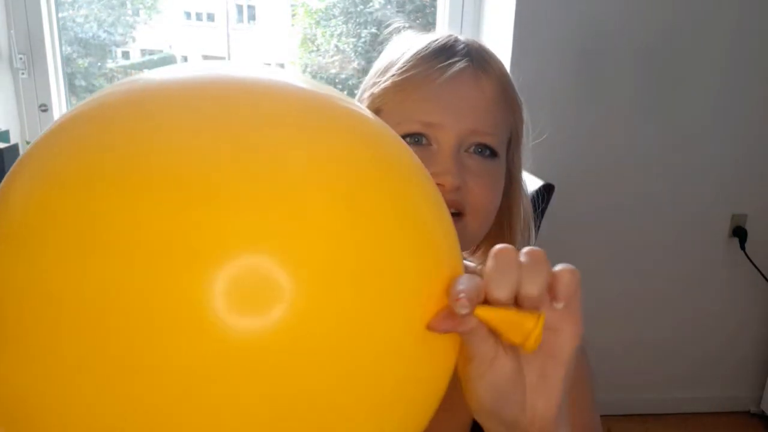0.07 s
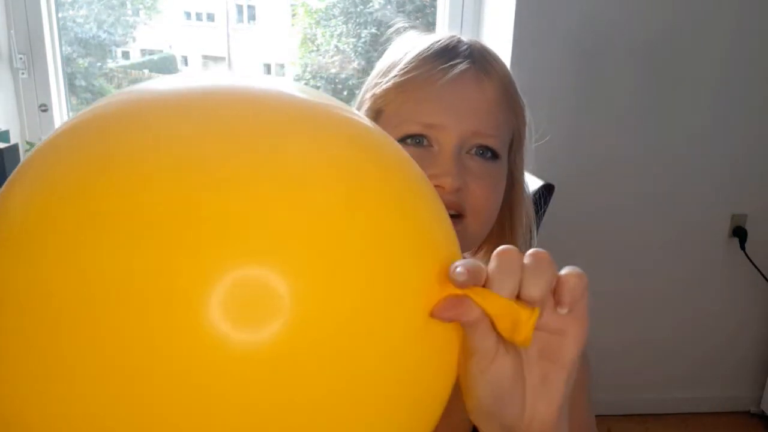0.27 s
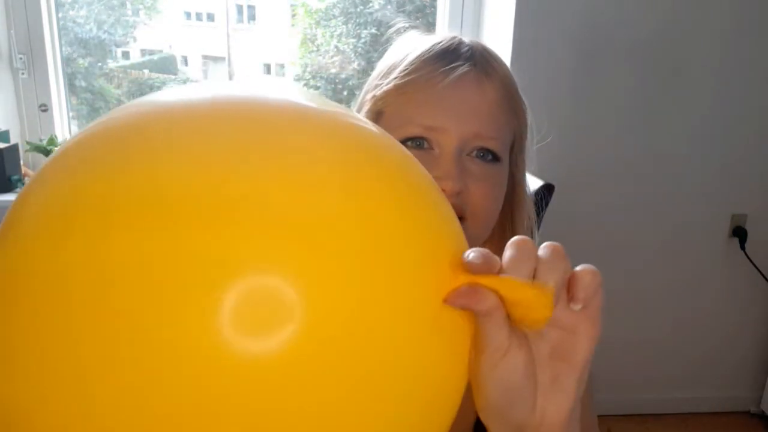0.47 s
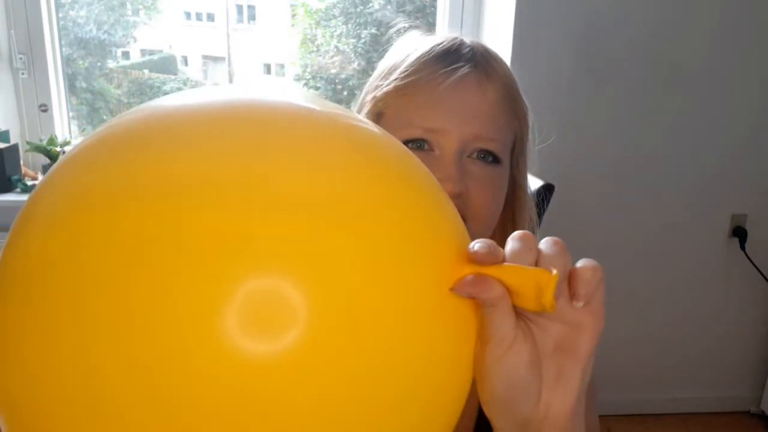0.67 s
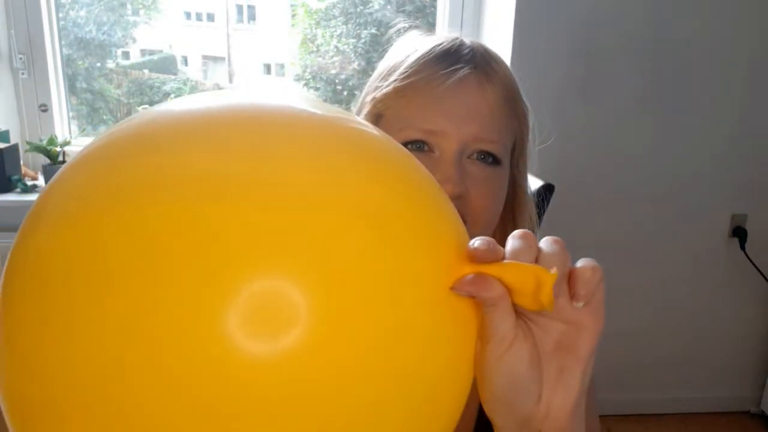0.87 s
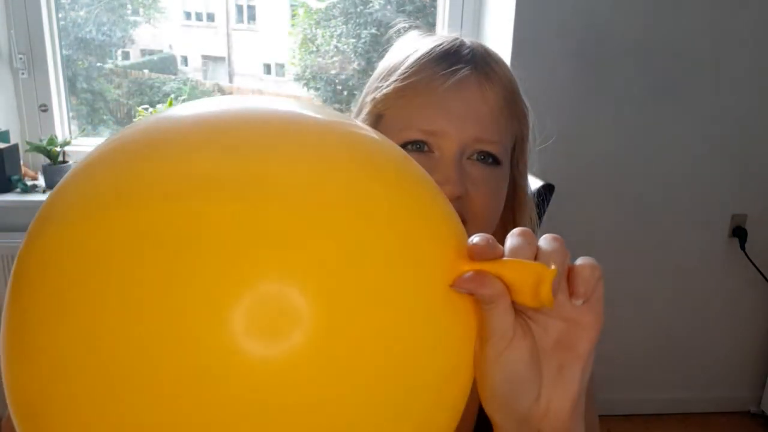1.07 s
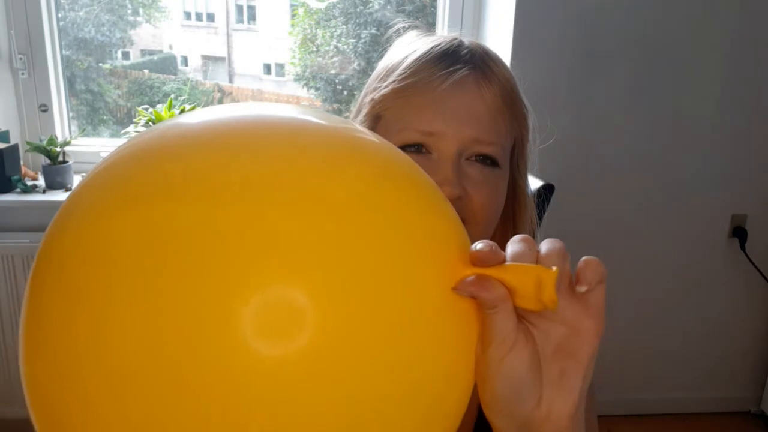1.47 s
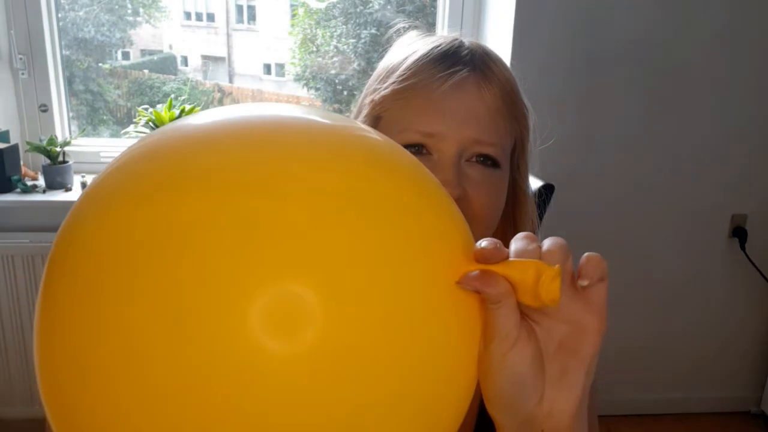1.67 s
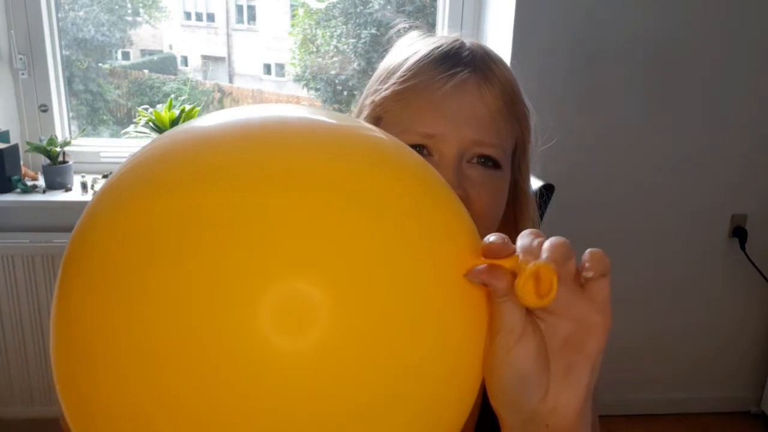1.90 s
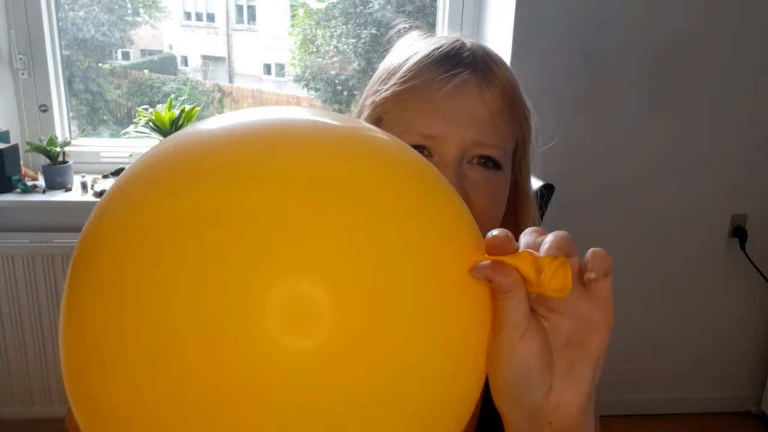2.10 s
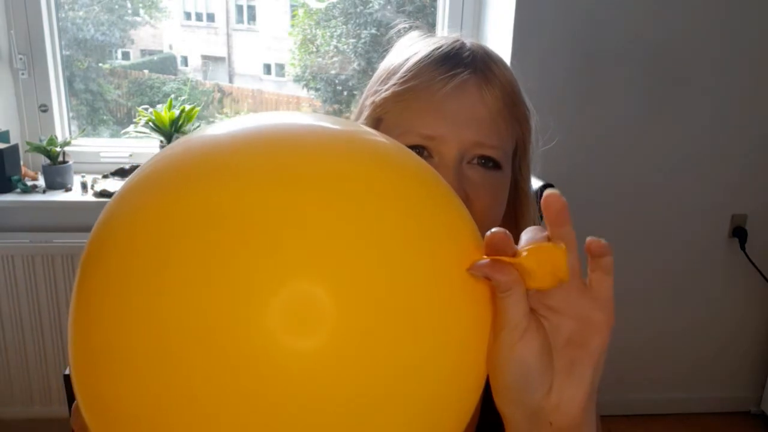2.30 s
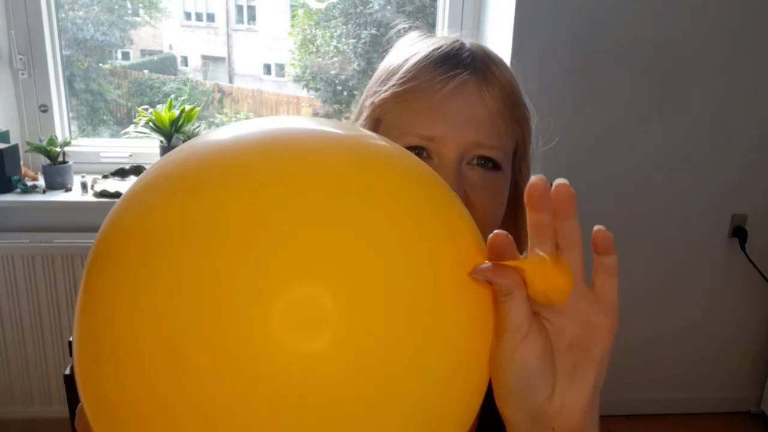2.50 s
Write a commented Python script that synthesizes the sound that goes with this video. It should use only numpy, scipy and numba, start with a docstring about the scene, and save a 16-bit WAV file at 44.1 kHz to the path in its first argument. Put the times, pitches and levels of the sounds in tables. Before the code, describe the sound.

Air hisses and sputters out of a large balloon's neck, close by indoors.

```python
"""A faint leak of air swells into a loud hiss with rough, low puffs: a big balloon is being let down
close by in a small room. Air rushing through the neck makes the hiss, the slack rubber flaps out the
puffs, and the air inside hums. Rubber ticks as it slips under the fingers. Near the end the neck is
pinched, so the flutter stops and the hiss narrows; it opens once more and is closed."""
import sys
import numpy as np
from scipy import signal
from scipy.fft import rfft, irfft, next_fast_len
from scipy.io import wavfile
from numba import njit

SR = 44100
rng = np.random.default_rng(int(sys.argv[2]) if len(sys.argv) > 2 else 0)


def wrap_up_sound(samples):
    """Save the sound to the file named by the first command line argument, as 16-bit audio."""
    columns = np.atleast_2d(samples).T
    # keep every value between -1 and 1, then stretch to whole-number steps
    tamed = np.clip(columns, -1, 1)
    steps = np.round(tamed * 32767).astype(np.int16)
    wavfile.write(sys.argv[1], SR, steps)


N = 116865
TIME = np.arange(N) / SR


def gain(db):
    """Turn decibels into a number to multiply by."""
    return 10 ** (np.asarray(db) / 20)


def curve(table, column=1):
    """Join one column of a table with straight lines over time."""
    rows = np.array(table)
    return np.interp(TIME, rows[:, 0], rows[:, column])


def unit(x):
    """Scale to an average strength (rms) of 1."""
    return x / np.sqrt(np.mean(x ** 2))


def shape(x, response):
    """Filter a sound; response(f) says how much of each frequency gets through."""
    size = next_fast_len(2 * N)
    hz = np.maximum(np.arange(size // 2 + 1) * SR / size, 1e-3)
    return irfft(rfft(x, size) * response(hz), size)[..., :N]


def resonance(f, hz, width):
    """How strongly something that rings at hz answers each frequency f."""
    return 1 / (1 + 1j * (f * f - hz * hz) / (f * width))


def noise(colour):
    """Noise with the given balance of low and high frequencies."""
    hz, db = np.array(colour).T
    return unit(shape(rng.standard_normal(N), lambda f: gain(np.interp(np.log(f), np.log(hz), db))))


@njit
def band_pass(x, hz, width):
    """Keep the frequencies around hz; the centre and width may move."""
    out, band, low = np.empty(len(x)), 0., 0.
    for i in range(len(x)):
        tuning, damping = np.tan(np.pi * hz[i] / SR), width[i] / hz[i]
        now = (band + tuning * (x[i] - low)) / (1 + tuning * (tuning + damping))
        band, low = 2 * now - band, low + 2 * tuning * now
        out[i] = damping * now
    return out


def ringing_noise(hz, width):
    """Swirling air that rings around one pitch."""
    hz, width = hz * np.ones(N), width * np.ones(N)
    return unit(band_pass(band_pass(rng.standard_normal(N), hz, width), hz, width))


def wobble(hz):
    """A smooth random wiggle, about hz times a second."""
    return unit(shape(rng.standard_normal(N), lambda f: (f / hz) / (1 + (f / hz) ** 3)))


def steady(x, knee=0.39):
    """Even out a vibration's strength while its pitch still wanders."""
    return unit(x / np.hypot(abs(signal.hilbert(x)), knee))


def place(x, pan_db=0, lag_s=.00004):
    """Make stereo: the left side hears it slightly later, and louder if pan_db is above 0."""
    late = shape(x, lambda f: np.exp(-2j * np.pi * f * lag_s))
    return np.array([late * gain(pan_db / 2), x * gain(-pan_db / 2)])


def spread(make, pan_db=0, split_hz=7400):
    """A long stream of air: both sides share its lows, but each gets its own highs."""
    shared = shape(make(), lambda f: 1 / np.hypot(1, f / split_hz))
    own = shape(np.array([make(), make()]), lambda f: 1 / np.hypot(1, split_hz / f))
    return place(shared, pan_db) + own * gain(np.array([[pan_db], [-pan_db]]) / 2)


# Tone colour of the quiet room: f/Hz, relative level/dB
ROOM_COLOUR = [(25, -1), (120, -18), (400, -8), (800, -0.5), (2000, -2.5), (6000, -12), (15000, -15)]

def room_noise(level_db=-62):
    """A very soft rush, partly the same on both sides."""
    shared = noise(ROOM_COLOUR)
    own = np.array([noise(ROOM_COLOUR), noise(ROOM_COLOUR)])
    return gain(level_db) * (shared + 0.99 * own)


def echo_pattern(fade_s=0.37, treble_fade_s=0.22, split_hz=9900, gap_s=0.00214):
    """The walls answer a click with dense echoes; each fade time is for a drop of 60 dB."""
    echoes = rng.standard_normal((2, N))
    low = shape(echoes, lambda f: 1 / (1 + (f / split_hz) ** 2))
    tail = low * gain(-60 * TIME / fade_s) + (echoes - low) * gain(-60 * TIME / treble_fade_s)
    early = rng.standard_normal((2, N)) * gain(13) * np.exp(-TIME / 0.0048)
    pattern = (tail + early) * (TIME > gap_s)
    return pattern / np.sqrt(np.sum(pattern ** 2, axis=1, keepdims=True))


def moving_echoes(x, count=14):
    """The neck moves in the hand, so one pattern of echoes fades into the next."""
    position = np.linspace(0, count - 1, N)
    out = np.zeros((2, N))
    for k in range(count):
        share = np.sqrt(np.maximum(1 - abs(position - k), 0))
        out += signal.fftconvolve(x * share, echo_pattern()[:, :N // 6], axes=1)[:, :N]
    return out


# Gusts of air at their strongest: t/s, level/dB
GUSTS = [(.27, -41), (.45, -35.5), (.5, -38), (.98, -40)]

def gusts(swell_s=0.032):
    """The stream of air brushes the microphone with short, soft thumps."""
    swell = sum(gain(db) * np.exp(-((TIME - s) / swell_s) ** 2) for s, db in GUSTS)
    return steady(ringing_noise(hz=86, width=53)) * swell


# The balloon's hum: t/s, f/Hz of the lower tone, level/dB of both tones together
HUM = [(.15, 280, -87), (.2, 276, -38), (.26, 264, -32.5), (.35, 268, -45), (.55, 284, -39),
       (.64, 261, -60), (.73, 233, -36), (.85, 217, -33.5), (1.16, 205, -35.5), (1.3, 258, -36),
       (1.55, 214, -36.5), (1.65, 139, -41.5), (1.79, 126, -35.5), (1.85, 121, -47), (2.0, 119, -63.5),
       (2.65, 120, -81)]

def hum(waver=0.04):
    """The flow keeps the air inside ringing at two pitches; the lower sinks as the balloon empties."""
    lower = steady(ringing_noise(curve(HUM) * (1 + waver * wobble(8)), width=45.5))
    upper = steady(ringing_noise(hz=319.2, width=25))
    return (upper + gain(-2) * lower) * gain(curve(HUM, column=2))


def burst(start_s, db, decay_s, hz, width, rise_s=0.0041):
    """A short noise that rises quickly and dies away."""
    age = TIME - start_s
    rise = np.clip(age / rise_s, 0, 1)
    fall = np.exp(-np.maximum(age - rise_s, 0) / decay_s)
    return ringing_noise(hz, width) * gain(db) * rise * fall


def finger_tap():
    """A fingertip taps the rubber once."""
    return burst(start_s=2.495, db=-33, decay_s=0.006, hz=895, width=2600)


# Slips of the rubber: t/s, level/dB, f/Hz, decay/s
SLIPS = [(.2304, -9, 5170, 0.00067), (0.4227, -16, 4500, .0008), (.5136, -10, 4200, 0.0011),
         (0.52, -12, 3950, 0.001), (0.5407, -16, 3900, .0006), (0.5713, -14, 4100, .0015),
         (0.6923, -17, 5750, .0012)]

def ticks():
    """Rubber slips under the fingers; each slip rings for a few cycles."""
    out = np.zeros(N)
    for s, db, hz, decay in SLIPS:
        age = np.maximum(TIME - s, 0)
        out += gain(db) * np.sin(2 * np.pi * hz * age) * np.exp(-age / decay)
    return out


# Sudden spurts of air: t/s, level/dB, decay/s, f/Hz, width/Hz
SPURTS = [(0.4114, -16, 0.013, 2770, 9000), (.4115, -19, .0097, 10600, 9100),
          (0.51, -21.5, .011, 4130, 4000), (.689, -27, .007, 5600, 800), (1.255, -31.5, .02, 7500, 4000),
          (1.942, -31.5, 0.033, 7600, 4000), (2.368, -31.5, 0.021, 6760, 5500),
          (2.549, -44.5, 0.0083, 4300, 2400)]

def spurts():
    """Air bursts out each time the neck snaps open."""
    return sum(burst(*row) for row in SPURTS)


# Pitches at which the air in and around the balloon rings: f/Hz, width/Hz, relative level/dB
AIR_TONES = [(91, 33, -3.5), (130.4, 11, -1.5), (208, 9.4, -5.5), (268.5, 35, 2), (319.8, 9.1, 1.5),
             (406, 77, -3), (703, 16, 0.5), (770, 26, 0.5)]

def puff_sound(kicks, rise_s=.00016, fall_s=0.00023, bass_cut_hz=155):
    """Each kick becomes a small push of air that sets the balloon ringing."""
    age = TIME[:N // 100]
    puff = (1 - np.exp(-age / rise_s)) ** 2 * np.exp(-age / fall_s)
    flow = signal.fftconvolve(kicks, puff / puff.max())[:N]
    sound = shape(flow, lambda f: resonance(f, bass_cut_hz, bass_cut_hz) * 1j * f / bass_cut_hz)
    return shape(sound, lambda f: 1 + sum(gain(db) * resonance(f, hz, w) for hz, w, db in AIR_TONES))


# Strength of the flutter: t/s, level/dB
FLUTTER_LEVEL = [(.14, -68), (.18, -32.5), (.25, -32), (.35, -38), (.4, -35), (.43, -28), (.5, -33),
                 (.58, -32), (.65, -39.5), (.69, -33.5), (.82, -33.5), (.97, -31), (1.2, -32), (1.55, -33),
                 (1.78, -34), (1.84, -44), (1.95, -40.5), (2.02, -58), (2.205, -59), (2.225, -28.5),
                 (2.27, -33), (2.33, -40), (2.41, -42.5), (2.46, -55.5), (2.65, -71)]
# The hardest single puffs: t/s, relative level/dB
POPS = [(0.1998, -14), (0.207, -14), (0.2333, -12.5), (0.273, -21), (0.4111, -10), (0.4165, -12),
        (0.4315, -11), (0.4486, -12), (0.4713, -14), (0.5298, -16), (0.6967, -13.5), (0.867, -12.5),
        (0.9369, -12), (0.9666, -18), (1.028, -18), (1.146, -19), (1.309, -14), (1.375, -12.5)]

def flutter(gap_s=1 / 370, scatter_db=3, purr_hz=125.26, purr_db=5, jitter=0.19):
    """The slack neck throws uneven puffs; its flapping swings their strength into a rough purr."""
    gap_chance, size_chance = rng.standard_normal((N // 20, 2)).T
    at = (np.cumsum(np.exp(.6 * gap_chance)) * gap_s * SR).astype(int)
    size = gain(scatter_db * np.minimum(size_chance, 2))
    flap = np.cos(2 * np.pi * np.cumsum(purr_hz * (1 + jitter * wobble(25))) / SR)
    kicks = np.bincount(at[at < N], size[at < N], N) * gain(purr_db * flap)
    pops = np.zeros(N)
    for s, db in POPS:
        pops[int(s * SR)] = gain(db - 3)
    return unit(puff_sound(kicks)) * gain(curve(FLUTTER_LEVEL)) + puff_sound(pops)


# Tone colour of the sizzle: f/Hz, relative level/dB
SIZZLE_COLOUR = [(1000, -25), (4000, -34), (6000, 3), (7800, 7), (9500, 4.5), (10700, -3.5), (12500, 1.5),
                 (14500, -9), (16000, -7)]
# Strength of the sizzle: t/s, level/dB
SIZZLE_LEVEL = [(0, -76), (.15, -60), (.2, -40.5), (.4, -33), (.5, -37), (.62, -46), (.95, -42.5),
                (1.75, -49), (1.89, -39), (1.95, -33.5), (2.02, -63), (2.3, -45), (2.39, -41.5),
                (2.47, -44.5), (2.54, -46), (2.58, -62), (2.65, -60)]

def sizzle(flicker_db=3):
    """Air passes the rubber lips with a thin, high sizzle."""
    return spread(lambda: noise(SIZZLE_COLOUR)) * gain(curve(SIZZLE_LEVEL) + flicker_db * wobble(44))


# Pitches of the pinched neck: f/Hz, width/Hz, relative level/dB
PINCH_TONES = [(2030, 980, 1.5), (3470, 920, -4.5)]
# Their strength, high while the fingers squeeze: t/s, level/dB
PINCH_LEVEL = [(0, -66), (.08, -54), (.16, -47), (.24, -39), (.5, -33), (.63, -31), (.75, -40.5),
               (1.75, -37), (1.86, -28.5), (1.9, -39), (1.94, -44), (2.02, -30.5), (2.16, -29), (2.23, -31),
               (2.27, -36.5), (2.335, -31.5), (2.37, -51), (2.65, -75)]

def pinched_neck(flicker_db=1.7):
    """Swirling air rings in the squeezed neck."""
    def tones():
        return unit(sum(gain(db) * ringing_noise(hz, width) for hz, width, db in PINCH_TONES))
    return spread(tones, pan_db=2.5) * gain(curve(PINCH_LEVEL) + flicker_db * wobble(37))


# The neck's highest ringing pitch: t/s, f/Hz, level/dB
WHISTLE = [(.17, 4100, -68), (.24, 4060, -28), (.3, 4280, -29), (.35, 4330, -31), (.41, 4500, -28.5),
           (.47, 4150, -30), (.55, 4220, -32), (.63, 4370, -27.5), (.69, 4530, -33), (1.0, 4360, -35),
           (1.55, 4500, -34.5), (1.8, 4360, -34), (1.93, 4300, -38), (2.03, 4120, -31.5),
           (2.14, 4100, -36.5), (2.24, 4550, -31), (2.33, 4300, -39.5), (2.385, 4680, -31.5),
           (2.44, 4470, -52), (2.6, 4300, -63.5)]

def whistle(wander=0.014, flicker_db=2):
    """The neck half whistles; its pitch blurs as the rubber slackens."""
    hz = curve(WHISTLE) * (1 + wander * wobble(14))
    width_hz = 510 + 270 * TIME
    tone = spread(lambda: ringing_noise(hz, width_hz), pan_db=-4.5)
    return tone * gain(curve(WHISTLE, column=2) + flicker_db * wobble(45))


# Tone colour of the jet of air: f/Hz, relative level/dB
JET_COLOUR = [(60, -37), (300, -18.5), (700, -5), (1100, -5), (1500, -3), (2500, 1.5), (3300, 0),
              (4500, -1.5), (5200, -2), (6000, -1.5), (6800, -7.5), (8000, -7.5), (9300, -10.5),
              (10500, -16), (12200, -14), (13600, -14.5), (14600, -25.5), (16000, -17)]
# Strength of the jet: t/s, level/dB
JET_LEVEL = [(0, -66), (.1, -52), (.155, -49.5), (.185, -29.5), (.23, -27.5), (.4, -26), (.55, -28),
             (.8, -27.5), (1.3, -27.5), (1.79, -28.5), (1.89, -28), (1.935, -34), (1.97, -29),
             (2.04, -28.5), (2.2, -28.5), (2.33, -29), (2.36, -33.5), (2.39, -34), (2.46, -47),
             (2.54, -50.5), (2.58, -63), (2.65, -73)]

def hiss(puffs, follow=0.48, flicker_db=0.6):
    """The rushing jet with its sizzle and neck tones; each puff lets a little more air through."""
    surge = np.exp(follow * np.tanh(puffs / gain(-28.5))) * gain(flicker_db * wobble(10.8))
    jet = spread(lambda: noise(JET_COLOUR)) * gain(curve(JET_LEVEL))
    return surge * (jet + sizzle() + pinched_neck() + whistle())


def scene(low_pan_db=-2.5):
    """The balloon's high and low sounds, their echoes and the quiet room, added together."""
    puffs = flutter()
    highs = hiss(puffs) + spread(spurts) + place(ticks())
    lows = place(puffs + finger_tap(), low_pan_db)
    echoes = moving_echoes(gain(-5) * highs + gain(-6) * lows)
    background = room_noise() + place(hum() + gusts(), low_pan_db)
    return background + echoes + lows + highs


def record(dry, low_cut_hz=58, top_hz=15800):
    """Take away the deepest bass and the highest treble."""
    thin = signal.sosfilt(signal.butter(2, low_cut_hz, "highpass", fs=SR, output="sos"), dry)
    return signal.sosfilt(signal.ellip(10, .2, 80, top_hz, fs=SR, output="sos"), thin)


dry = scene()
out = record(dry)
wrap_up_sound(out)
```